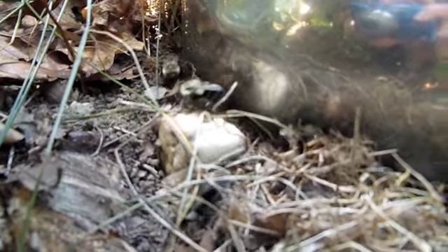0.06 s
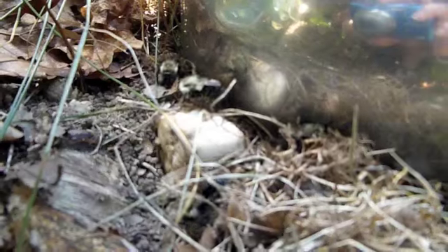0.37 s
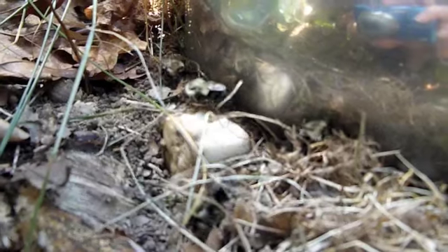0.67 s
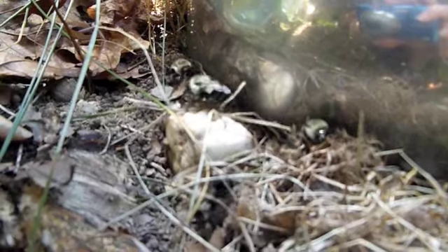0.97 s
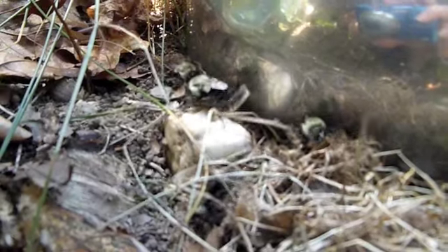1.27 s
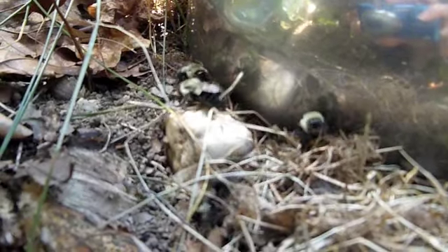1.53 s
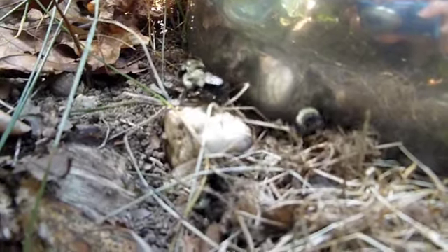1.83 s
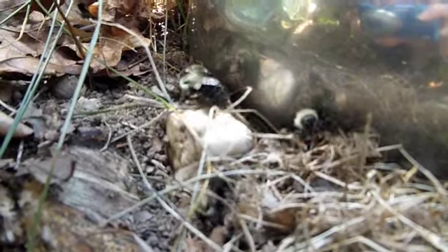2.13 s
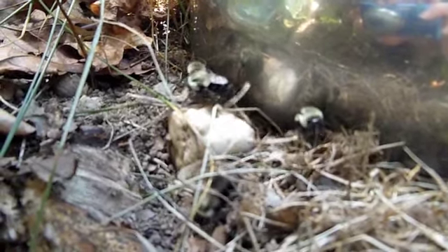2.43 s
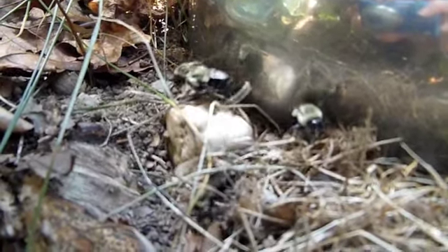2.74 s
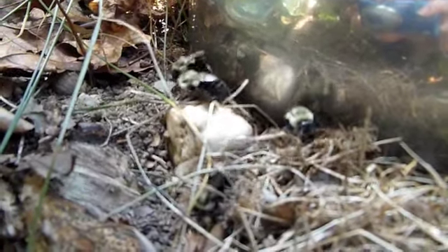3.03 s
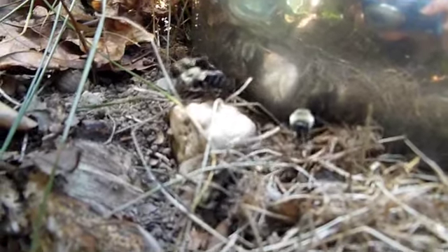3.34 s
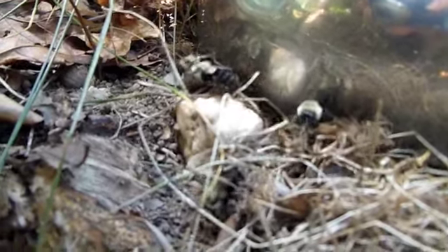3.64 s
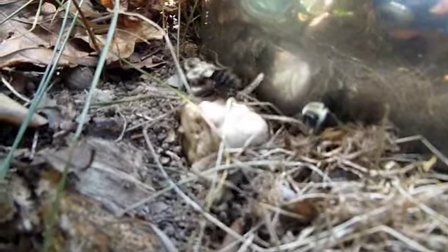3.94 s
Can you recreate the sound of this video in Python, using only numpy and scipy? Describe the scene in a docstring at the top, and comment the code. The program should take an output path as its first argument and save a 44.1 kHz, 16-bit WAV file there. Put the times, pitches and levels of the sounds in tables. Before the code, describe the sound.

A faint chatter of very short bumblebee buzzes, with one soft bump at the start.

```python
"""Outdoors, close to the ground where bumblebees crawl: a faint chatter of very short, rasping buzzes.
Each buzz is a swell of ringing pulses, about 200 a second, roughened with noise and lightly echoed.
A bump on the camera knocks once at the start. Underneath lies a bed of softly rumbling air,
a low distant hum, and the steady hiss and thin whine of the recorder."""
import sys
import numpy as np
from scipy import signal
from scipy.fft import rfft, irfft, next_fast_len
from scipy.io import wavfile
from scipy.ndimage import map_coordinates

SR = 44100
rng = np.random.default_rng(int(sys.argv[2]) if len(sys.argv) > 2 else 0)


def file_out(sig):
    """Save sig as 16-bit WAV at sys.argv[1]."""
    # one column per channel
    cols = np.atleast_2d(sig).T
    # limit, then scale
    lim = np.clip(cols, -1, 1)
    pcm = np.round(lim * 32767).astype(np.int16)
    wavfile.write(sys.argv[1], SR, pcm)


N = 176400


def bumblebees(trim_db=-1.5, lead_s=0.001488, weak_per_s=70, gap_s=0.018, echo_db=-7.5, echo_t60_s=0.28):
    """Clear buzzes over a random chatter of weaker ones, with a short echo off the surroundings."""
    # the clear buzzes (time [s], length [s], level before trim and EQ [dB], ring [Hz])
    clear_buzzes = [(0.043, 0.026, -46.0, 950), (0.241, 0.015, -45.5, 1110), (0.272, 0.015, -43.5, 826),
                    (0.346, 0.0078, -40.5, 855), (0.403, 0.011, -44, 960), (0.494, 0.02, -45.5, 1260),
                    (0.55, 0.023, -47, 890), (0.607, 0.011, -42.5, 1330), (0.627, 0.01, -46, 810),
                    (0.695, 0.014, -46.5, 870), (0.743, 0.024, -45, 870), (0.81, 0.011, -44.5, 820),
                    (0.845, 0.019, -43.6, 1080), (0.952, 0.014, -42, 1150), (0.987, 0.014, -41.5, 1160),
                    (1.039, 0.015, -41.5, 1020), (1.114, 0.0097, -48.5, 1270), (1.162, 0.023, -47.5, 930),
                    (1.197, 0.014, -43.5, 1180), (1.226, 0.0079, -42, 1210), (1.255, 0.011, -45.5, 1190),
                    (1.284, 0.018, -45.5, 1350), (1.31, 0.0072, -42, 855), (1.378, 0.011, -46.5, 1100),
                    (1.518, 0.014, -44, 1040), (1.674, 0.02, -46.5, 1340), (1.723, 0.011, -44, 930),
                    (1.844, 0.0087, -43.5, 900), (1.876, 0.018, -47.5, 820), (1.963, 0.017, -44.5, 990),
                    (2.087, 0.0078, -41, 834), (2.187, 0.011, -45, 1120), (2.265, 0.017, -45.5, 1140),
                    (2.512, 0.0071, -42.5, 1160), (2.611, 0.012, -42.8, 1100), (2.686, 0.011, -44.5, 770),
                    (2.788, 0.011, -46, 1046), (2.896, 0.037, -50.5, 1230), (3.058, 0.012, -46, 1110),
                    (3.08, 0.013, -45, 830), (3.117, 0.027, -47.5, 990), (3.173, 0.012, -47.5, 1290),
                    (3.188, 0.0089, -41, 880), (3.417, 0.02, -46.0, 800), (3.497, 0.016, -47.5, 830),
                    (3.582, 0.013, -39.5, 835), (3.599, 0.0084, -45, 1060), (3.662, 0.0072, -40.5, 960),
                    (3.731, 0.019, -42, 876), (3.77, 0.014, -44.5, 800), (3.889, 0.026, -48.5, 1040),
                    (3.944, 0.032, -47.5, 1230), (3.978, 0.013, -44, 1040)]
    # level ride of the weak buzzes (time [s], level before EQ [dB])
    chatter_ride = [(0, -48), (.15, -58), (.55, -52), (.67, -59.5), (1.0, -55), (1.6, -53), (1.8, -55),
                    (2.0, -51.5), (2.22, -62), (2.38, -58.5), (2.5, -52.5), (2.75, -56), (2.9, -52),
                    (3.1, -55), (3.28, -57), (3.5, -54.5), (4, -53)]
    # EQ on all buzzes and their echo (frequency [Hz], gain [dB])
    buzz_eq = [(150, -11.5), (385, -0.5), (535, -7), (660, 4.5), (750, -7), (825, 5), (930, -10),
               (1040, 0.5), (1140, -5.5), (1232, 2.5), (1400, -5), (1480, -6), (1600, -1), (1850, -6.5),
               (1950, -5.5), (2400, -13.5), (4000, -25.5)]
    t = np.arange(SR // 2) / SR
    tail = rng.standard_normal(len(t)) * amp(-60 * t / echo_t60_s)
    track = np.zeros(N)
    for time_s, length_s, db, ring_hz in clear_buzzes:
        add(track, amp(db + trim_db) * buzz(length_s, ring_hz), time_s - lead_s)
    clear_times = np.transpose(clear_buzzes)[0]
    for slot in range(int(weak_per_s * N / SR)):
        time_s = (slot + rng.uniform(0, 1)) / weak_per_s
        db = np.interp(time_s, *np.transpose(chatter_ride)) + 1.97 * rng.standard_normal()
        detune_oct = 0.28 * np.clip(rng.standard_normal(), -2, 2)
        weak = buzz(length_s=0.015, ring_hz=1093 * 2 ** detune_oct)
        if np.min(np.abs(clear_times - time_s)) > gap_s:  # leave space around the clear buzzes
            add(track, amp(db) * weak, time_s)
    echo = signal.fftconvolve(track, tail / np.linalg.norm(tail))[:N]
    return coloured(track + amp(echo_db) * echo, buzz_eq)


def buzz(length_s, ring_hz, pulse_hz=205.76, count=17, decay_s=0.00093, rasp_gain=0.83, rasp_oct=0.53):
    """One buzz: uneven pulses whose ring slides down, swelling and fading with a band of raspy noise."""
    t = np.arange(-SR // 24, SR // 24) / SR
    period_s = 1 / (pulse_hz * (1 + 0.015 * rng.standard_normal()))
    jitter = 0.066 * rng.standard_normal(count)
    onsets = period_s * (np.arange(count) - count // 2 + jitter)
    hz = ring_hz * 2 ** (-0.25 * np.clip(onsets / length_s, -1, 1))  # falls half an octave in all
    age = np.maximum(t - onsets[:, None], 0)
    pulses = np.sum(np.exp(-age / decay_s) * np.sin(2 * np.pi * hz[:, None] * age), axis=0)
    edges_hz = [ring_hz / 2 ** rasp_oct, ring_hz * 2 ** rasp_oct]
    band = signal.butter(2, edges_hz, "band", fs=SR, output="sos")
    rasp = signal.sosfilt(band, rng.standard_normal(len(t)))
    width_s = length_s * np.where(t < 0, 0.85, 1)  # the attack is a little quicker than the release
    swell = 2 ** (-2 * (t / width_s) ** 2)
    return unit(unit(pulses) + rasp_gain * unit(rasp)) * swell


def camera_bump():
    """One bump on the camera: a tight cluster of soft, low knocks, each a few cycles at most."""
    # the knocks (time [s], pitch [Hz], half-width [s], envelope peak [dB])
    knocks = [(.014, 284, 0.0077, -35), (0.0298, 270, 0.0021, -27), (0.0354, 94.4, 0.0078, -22.5),
              (.05, 91, .01, -45)]
    t = np.arange(N) / SR
    track = np.zeros(N)
    for time_s, hz, width_s, db in knocks:
        envelope = amp(db) * np.exp(-((t - time_s) / width_s) ** 2)
        track += envelope * np.sin(2 * np.pi * hz * (time_s - t))
    return track


def air_rumble(level_db=-51, sway_db=0.5):
    """A soft rumble of air that sways slightly in level."""
    # tone of the rumble (frequency [Hz], relative level [dB])
    spectrum = [(15, -11.5), (30, -6.5), (65, -4), (110, -0.5), (170, -5), (300, -10.5), (550, -14.5),
                (1000, -20.5), (2000, -26), (4000, -54.5)]
    return amp(level_db + sway_db * wobble(4.2)) * noise(spectrum)


def distant_hum(pitch_hz=50.7, wander_hz=1.5, waver_db=2.3):
    """A low tone from far off that wanders in pitch and wavers in level."""
    # level ride of the hum (time [s], rms level [dB])
    hum_ride = [(0, -55), (2.249, -54), (2.5, -67), (2.85, -68), (3.05, -58), (3.701, -56), (3.8, -60),
                (4, -64)]
    phase = 2 * np.pi * np.cumsum(pitch_hz + wander_hz * wobble(3.4)) / SR
    db = np.interp(np.arange(N) / SR, *np.transpose(hum_ride)) + waver_db * wobble(9)
    return amp(db) * np.sqrt(2) * np.sin(phase)


def amplifier_noise(hiss_db=-62):
    """The microphone amplifier's steady hiss and thin electrical whine."""
    # tone of the hiss (frequency [Hz], relative level [dB])
    spectrum = [(100, 1), (2000, -2), (3000, -2), (4500, -4.5), (6600, -5.5), (7100, -10.5), (7600, -19),
                (8000, -35.5)]
    # tones of the whine (frequency [Hz], rms level [dB])
    tones = [(3112, -85), (6223, -86), (6665, -84)]
    t = np.arange(N) / SR
    whine = sum(amp(db) * np.sqrt(2) * np.sin(2 * np.pi * hz * t) for hz, db in tones)
    return amp(hiss_db) * noise(spectrum) + whine


def amp(db):
    """Decibels to gain."""
    return 10 ** (np.asarray(db) / 20)


def unit(x):
    """Scale to rms 1."""
    return x / np.sqrt(np.mean(x ** 2) + 1e-20)


def wobble(rate):
    """Smooth random modulation through `rate` points a second."""
    points = rng.standard_normal(int(N * rate / SR) + 4)
    return map_coordinates(points, [np.arange(N) * rate / SR])


def coloured(x, curve):
    """Minimum-phase EQ along a curve of (frequency [Hz], gain [dB])."""
    size = 2 * next_fast_len(N)
    hz, db = np.transpose(curve)
    bin_db = np.interp(np.log(np.fft.rfftfreq(size, 1 / SR) + 1), np.log(hz + 1), db)
    cepstrum = irfft(np.log(amp(bin_db)))
    cepstrum[1:size // 2] *= 2  # folded onto positive time, so nothing rings ahead of a sound
    cepstrum[size // 2 + 1:] = 0
    return irfft(rfft(x, size) * np.exp(rfft(cepstrum)))[:N]


def noise(spectrum):
    """Coloured noise of rms 1."""
    return unit(coloured(rng.standard_normal(N), spectrum))


def add(track, sound, centre_s):
    """Mix a sound into the track, centred on a time."""
    at = round(centre_s * SR) - len(sound) // 2 + np.arange(len(sound))
    inside = (at >= 0) & (at < N)
    track[at[inside]] += sound[inside]


def scene():
    """The background bed, the bump and the bees, mixed to mono."""
    return (air_rumble() + distant_hum() + amplifier_noise() + camera_bump() + bumblebees())[None]


def record(dry, top_hz=8000, dc_offset=0.0186):
    """The recorder cuts everything above its band limit and adds a small steady offset."""
    size = next_fast_len(N + SR // 2)
    passband = np.fft.rfftfreq(size, 1 / SR) < top_hz
    return dc_offset + irfft(rfft(dry, size) * passband, size)[..., :N]


dry = scene()
out = record(dry)
file_out(out)
```